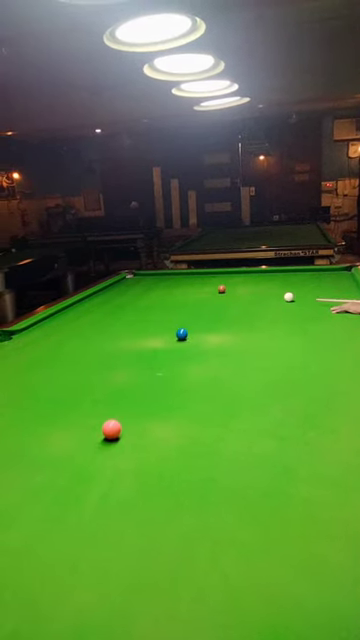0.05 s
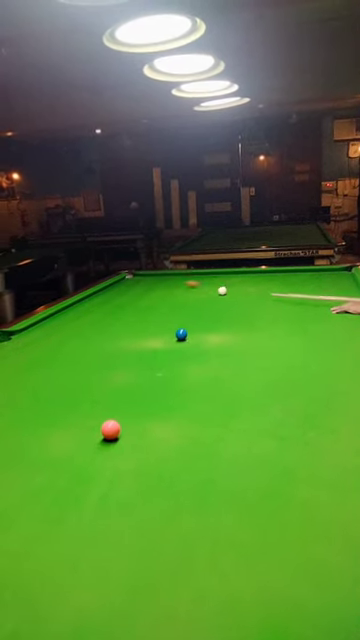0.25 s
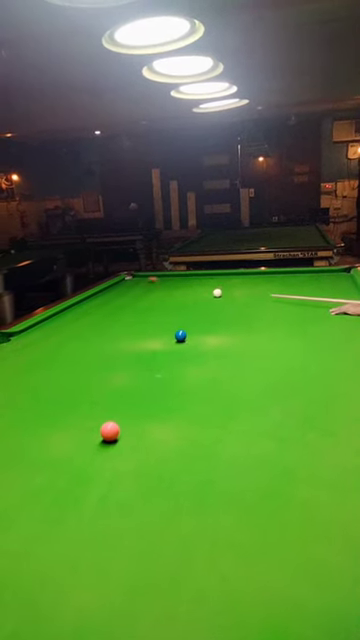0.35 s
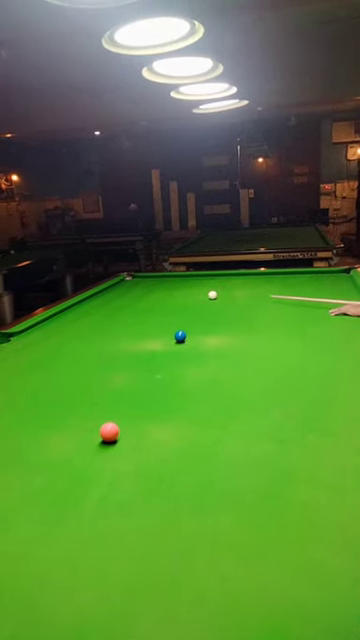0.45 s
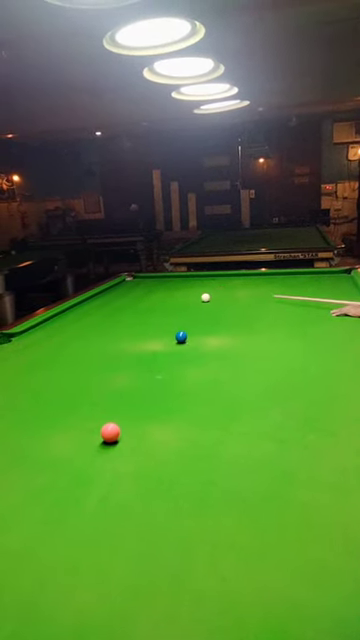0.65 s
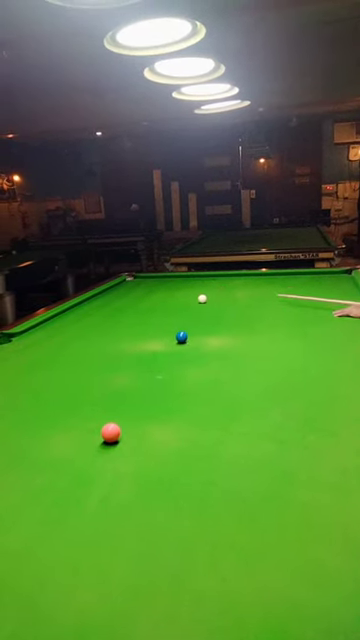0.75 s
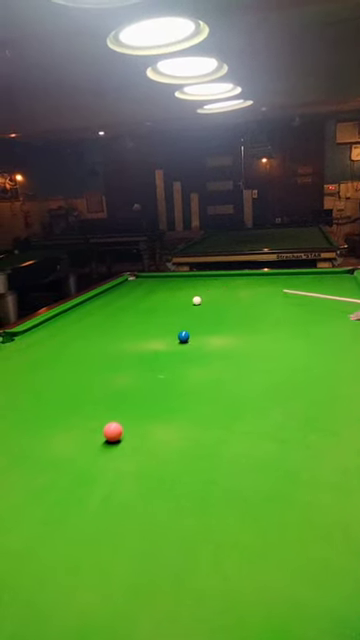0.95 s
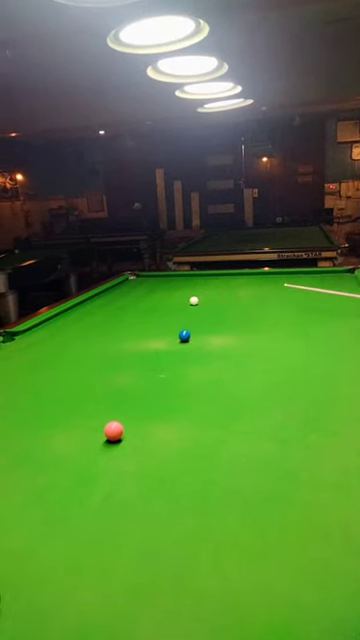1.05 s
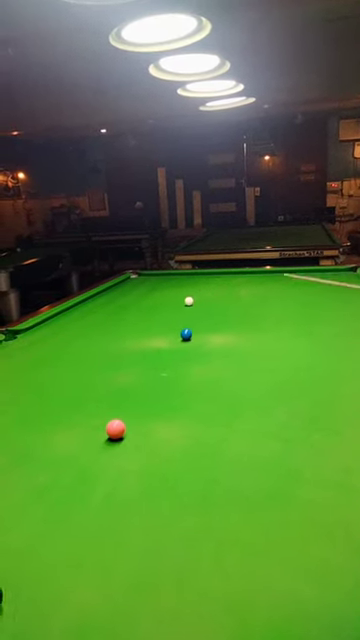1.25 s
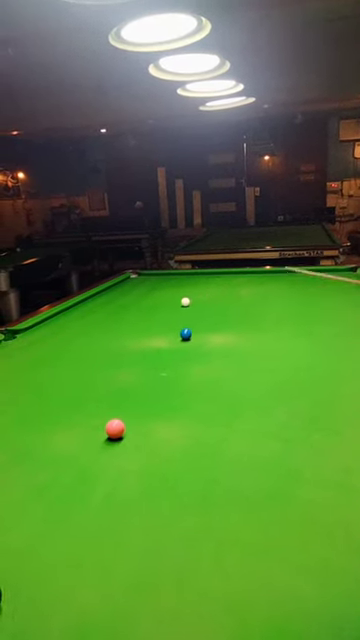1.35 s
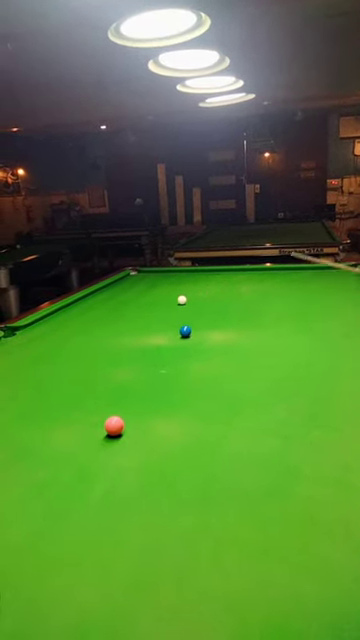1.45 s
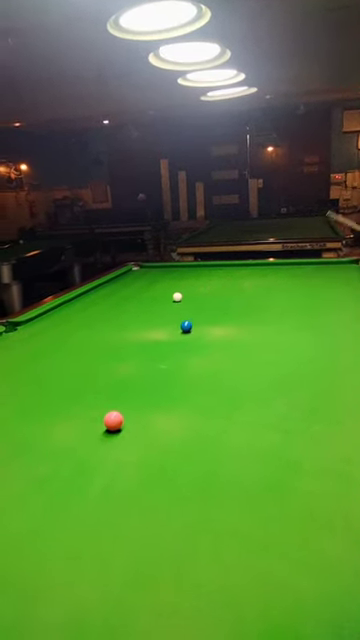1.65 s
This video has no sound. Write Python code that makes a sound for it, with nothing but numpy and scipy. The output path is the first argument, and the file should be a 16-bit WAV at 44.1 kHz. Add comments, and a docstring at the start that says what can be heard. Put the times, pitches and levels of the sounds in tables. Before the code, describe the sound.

One snooker ball clacks against another, which thuds into a pocket in a quiet hall.

```python
"""A faint, low rumble fills a large, quiet hall, with a thin whine and the tones of the lamps.
A snooker cue taps the white ball and its shaft rings briefly. The white clacks against a red,
echoed by table and ceiling. The red thuds into a far pocket, the table's frame rings and the hall
rings on. Soft rustles follow, a low hum grows, and at the end balls click on a far table."""
import sys
import numpy as np
from scipy import signal
from scipy.fft import rfft, irfft, next_fast_len
from scipy.io import wavfile

SR = 44100
rng = np.random.default_rng(int(sys.argv[2]) if len(sys.argv) > 2 else 0)


def to_wav(sig):
    """Store sig (one row per channel, or 1-D mono) as 16-bit WAV at the path in sys.argv[1].

    Samples outside -1..1 are clipped; the rate is SR.
    """
    pcm = np.clip(np.atleast_2d(sig), -1, 1) * 32767
    pcm = np.round(pcm).astype(np.int16)
    wavfile.write(sys.argv[1], SR, pcm.T)  # frames by channels


N = 74970

# tone colour of the hall's rumble, airy noise and high hiss (frequency [Hz], relative level [dB])
RUMBLE_COLOUR = [(15, -13), (28, 5), (45, 0), (65, 0), (85, -10.5), (130, -3), (200, -8.5), (300, -32.5),
                 (500, -28), (1000, -92)]
AIR_COLOUR = [(100, -9.5), (250, 1.5), (400, -8), (1000, -11), (2000, -18.5), (4000, -25.5), (8000, -33.5),
              (16000, -40)]
HISS_COLOUR = [(2000, -20), (5000, -14), (8200, 3.5), (10000, -8.5), (14000, -3), (15000, 2.5),
               (16000, -17.5)]
# how loud those three and the hum are as time passes (time [s], level [dB])
RUMBLE_LEVEL = [(0, -64), (.45, -61.5), (.95, -59), (1.08, -58), (1.7, -57.5)]
AIR_LEVEL = [(0, -76), (.6, -83), (1.6, -69.5)]
HISS_LEVEL = [(0, -88), (.45, -83), (1.1, -73.5), (1.35, -81), (1.65, -74)]
HUM_LEVEL = [(0, -88), (1.25, -78), (1.45, -66), (1.7, -60)]
# the lamps' steady tones (frequency [Hz], level [dB])
LAMP_TONES = [(2745, -94), (3074, -89)]

# the cue's tip touching the white (time [s], thud level [dB], tick level [dB])
CUE_HITS = [(0.1414, -20.5, -27), (.1475, -19.5, -18.5)]
# tone colour of that thud and tick (frequency [Hz], relative level [dB])
CUE_THUD = [(80, -20.5), (220, -3), (750, 0.5), (1300, -0.5), (2000, -20.5), (4000, -13), (16000, -85)]
CUE_TICK = [(300, -78), (1500, 1.5), (3000, 4), (6000, -6), (8000, -1.5), (10000, -15.5), (14500, -16),
            (16000, -41)]
# A fade time, or t60, is how long a sound takes to drop by 60 dB.
# the notes of the cue's shaft (frequency [Hz], level [dB], fade time [s])
SHAFT_NOTES = [(234, -56.5, 1), (790, -50, .15), (1560, -44.5, 0.59), (2130, -57.5, .4), (2865, -46, 0.18),
               (3560, -53, 0.12), (3944, -56, 0.26), (5150, -55.5, 0.27), (5669, -61, 0.65)]
# how long the hall rings (frequency [Hz], fade time [s])
HALL_FADE = [(100, 2), (250, 1.63), (400, 1.554), (1000, 1.454), (2000, 1.29), (4000, 1.177), (8000, 1),
             (12000, 0.75), (16000, 0.41)]

# ball on ball: the white on the red, then a far table (time [s], level [dB])
CLACKS = [(0.2301, -9.5), (1.6906, -39)]
# tone colour of a clack, its ring in the hall and its sizzle (frequency [Hz], relative level [dB])
CLACK_COLOUR = [(100, -42), (500, -27), (1200, -11), (2000, -3.5), (2700, -1), (3500, -7.5), (4400, -20),
                (6000, -31), (8400, -34), (10000, -43), (16000, -33)]
CLACK_IN_HALL = [(60, -70), (140, -28), (300, -17.5), (700, -22), (1300, -7), (2000, -1), (2600, 0),
                 (3500, -7.5), (4400, -16), (6000, -29.5), (8400, -32), (10000, -41), (16000, -41)]
SIZZLE_COLOUR = [(4000, -34), (7000, -57), (8400, -7), (9700, -28), (12000, -15), (13300, -32), (14900, -5),
                 (16000, -14.5)]
# early echoes off table, lamps and ceiling (delay [s], level against the direct click [dB])
ECHOES = [(.0015, 1.5), (.0060, -6), (.0070, -1.5), (.0108, -3), (.0116, -5), (.0126, -3.5), (.0325, -12),
          (0.0433, -8), (.0458, -6), (0.0542, -12)]

# the red bumping around the pocket (time [s], thud level [dB], knock level [dB])
POCKET_HITS = [(0.4918, -16, -23), (0.4969, -5, -15), (.5040, -3.5, -6.5), (0.5131, -15, -5.5),
               (0.5251, -19, -11.5), (0.5411, -17.5, -13.5)]
# tone colour of that thud and knock (frequency [Hz], relative level [dB])
POCKET_THUD = [(60, -58.5), (140, -25), (200, -9), (260, -5.5), (350, 0.5), (540, -2), (800, -8.5),
               (1500, -18), (4000, -48), (16000, -51)]
POCKET_KNOCK = [(150, -15.5), (500, -7.5), (1050, 1), (1550, 0), (2000, -5), (2700, -8), (3800, -13.5),
                (4500, -26), (6500, -26.5), (8300, -21), (10500, -37), (16000, -55)]
# the notes of the table's frame (frequency [Hz], level [dB], fade time [s])
FRAME_NOTES = [(336, -23, .11), (392.7, -37.5, 1.23), (502, -21, 0.027), (594, -43.5, 0.65),
               (660.6, -45, 0.36), (1048, -29, 0.17), (1308, -46, 1.3), (1472, -43.5, 0.79),
               (1589, -46.5, .7)]

# soft rustles (time [s], level [dB], rise time [s], fade time [s], treble tilt [dB per octave])
RUSTLES = [(0.496, -64, 0.0036, .25, 2), (.612, -56.5, .002, 0.96, 4), (0.772, -62, .002, 0.76, 1),
           (.861, -57.5, 0.0012, 0.7, 1), (.885, -60, 0.016, 0.99, -8.5), (1.416, -73.5, 0.0039, .95, 11),
           (1.543, -58.5, 0.032, 0.26, -4), (1.694, -58.5, 0.003, .4, -3)]
# their tone colour before the tilt (frequency [Hz], relative level [dB])
RUSTLE_COLOUR = [(1000, -45), (4500, -12), (6800, -5), (8200, 4), (10000, -6.5), (13000, -9.5),
                 (15000, -11), (16000, -24.5)]


def amp(db):
    """Turn decibels into a number to multiply a sound by."""
    return 10 ** (np.asarray(db) / 20)


def unit(x):
    """Scale x to an average strength (rms) of 1."""
    return x / np.sqrt(np.mean(x ** 2) + 1e-20)


def clock():
    """The time of each sample, in seconds."""
    return np.arange(N) / SR


def along(points, hz):
    """Read between (frequency, value) points, spacing octaves evenly."""
    freqs, values = np.transpose(points)
    return np.interp(np.log(hz + 1), np.log(freqs + 1), values)


def level(points):
    """A volume curve through (time [s], level [dB]) points."""
    return amp(np.interp(clock(), *np.transpose(points)))


def at(s, x):
    """Start x after s seconds."""
    return np.pad(x, (max(0, int(round(s * SR))), 0))[:N]


def through(x, response):
    """Let every sample of x set off a copy of the response (convolution)."""
    return signal.fftconvolve(x, response)[:N]


def filtered(x, gain_at):
    """Turn each frequency in x up or down by gain_at(hz)."""
    size = next_fast_len(N + SR // 2)
    hz = np.fft.rfftfreq(size, 1 / SR)
    return irfft(rfft(x, size) * gain_at(hz), size)[:N]


def noise(colour):
    """Noise of strength 1 with this tone colour."""
    return unit(filtered(rng.standard_normal(N), lambda hz: amp(along(colour, hz))))


def narrow_noise(centre_hz, width_hz):
    """Noise of strength 1 near one frequency; near 0 Hz it is a random wobble."""
    return unit(filtered(rng.standard_normal(N), lambda hz: 1 / (1 + ((hz - centre_hz) / width_hz) ** 2)))


def tone(hz):
    """A steady tone of strength 1."""
    return unit(np.sin(2 * np.pi * hz * clock()))


def fade(t, t60):
    """A curve that drops by 60 dB every t60 seconds."""
    return np.exp(-np.log(1000) * t / t60)


def swell(rise_s, t60):
    """A volume curve that rises, then dies away."""
    return (1 - np.exp(-clock() / rise_s)) * fade(clock(), t60)


def room_noise():
    """The hall's rumble, airy noise and hiss, each drifting slowly in level."""
    rumble = level(RUMBLE_LEVEL) * noise(RUMBLE_COLOUR)
    air = level(AIR_LEVEL) * noise(AIR_COLOUR)
    hiss = level(HISS_LEVEL) * noise(HISS_COLOUR)
    return rumble + air + hiss


def whine(hz=3060):
    """A faint, high tone wrapped in hiss; both fade together."""
    hiss = amp(-3) * narrow_noise(hz, width_hz=200)
    return amp(-78) * fade(clock(), t60=2.7) * (tone(hz) + hiss)


def lamps():
    """The lamps give off thin, steady tones."""
    return sum(amp(db) * tone(hz) for hz, db in LAMP_TONES)


def hum(hz=170.3, waver_db=-0.5):
    """A low hum that trembles slightly and grows toward the end."""
    return level(HUM_LEVEL) * tone(hz) * amp(waver_db * narrow_noise(0, width_hz=12))


def pulse(colour, size=4096):
    """The shortest pulse with this tone colour and nothing before its start, energy 1."""
    gains = amp(along(colour, np.fft.rfftfreq(size, 1 / SR)))
    cepstrum = irfft(np.log(gains))
    # folding the second half onto the first packs the energy at the start
    cepstrum[1:size // 2] *= 2
    cepstrum[size // 2 + 1:] = 0
    wave = irfft(np.exp(rfft(cepstrum)))
    return np.pad(wave / np.linalg.norm(wave), (0, N - size))


def bump(colour, t60, hall_db):
    """A hit on something that barely rings: a short burst of noise and the hall's answer."""
    burst = rng.standard_normal(N) * fade(clock(), t60)
    return through(burst / np.linalg.norm(burst) + amp(hall_db) * hall(), pulse(colour))


def ring(notes, rise_s, waver_hz):
    """A struck object's fading notes; each wavers in pitch as it mixes with its echoes."""
    sound = np.zeros(N)
    for hz, db, t60 in notes:
        start_phase = rng.random()
        pitch = hz + waver_hz * narrow_noise(0, width_hz=24.6)
        cycles = start_phase + np.cumsum(pitch) / SR
        sound += amp(db) * swell(rise_s, t60) * np.sin(2 * np.pi * cycles)
    return sound


def cue():
    """The cue's tip thuds and ticks on the white ball, and the shaft rings."""
    hits = np.zeros(N)
    for s, thud_db, tick_db in CUE_HITS:
        thud = amp(thud_db) * bump(CUE_THUD, t60=0.016, hall_db=0)
        tick = amp(tick_db) * bump(CUE_TICK, t60=0.13, hall_db=0)
        hits += at(s, thud + tick)
    shaft = ring(SHAFT_NOTES, rise_s=0.004, waver_hz=4.6)
    return hits + at(CUE_HITS[0][0], shaft)


def hall(delay_s=0.003, build_s=0.02):
    """The hall's wash of echoes, energy 1: it builds up, and the treble dies first."""
    hz, t, bands = signal.stft(rng.standard_normal(N), SR, nperseg=256)
    bands = bands * fade(t, along(HALL_FADE, hz)[:, None])
    tail = signal.istft(bands, SR, nperseg=256)[1][:N]
    tail = at(delay_s, tail * (1 - np.exp(-clock() / build_s)))
    return tail / np.linalg.norm(tail)


def snap(colour, s):
    """A symmetric pulse with this tone colour, centred at s seconds, energy 1."""
    wave = filtered(at(s, signal.unit_impulse(N)), lambda hz: amp(along(colour, hz)))
    return wave / np.linalg.norm(wave)


def clack(s, db):
    """Two hard balls meet: one sharp click, its early echoes, the hall and a fine sizzle."""
    click = snap(CLACK_COLOUR, s)
    echoes = sum(amp(echo_db) * at(delay, click) for delay, echo_db in ECHOES)
    tail = amp(6) * through(snap(CLACK_IN_HALL, s), hall())
    sizzle = amp(-39.5) * noise(SIZZLE_COLOUR) * swell(rise_s=0.0034, t60=0.36)
    return amp(db) * (click + echoes + tail + at(s, sizzle))


def pocket():
    """The red bumps the pocket's padded edge and back, making the table's frame ring."""
    hits = np.zeros(N)
    for s, thud_db, knock_db in POCKET_HITS:
        thud = amp(thud_db) * bump(POCKET_THUD, t60=0.035, hall_db=-2.5)
        knock = amp(knock_db) * bump(POCKET_KNOCK, t60=0.074, hall_db=1.5)
        hits += at(s, thud + knock)
    frame = ring(FRAME_NOTES, rise_s=0.005, waver_hz=9.4)
    return hits + at(POCKET_HITS[0][0], frame)


def rustles():
    """Faint puffs of hiss that start quickly and fade, each with its own brightness."""
    sound = np.zeros(N)
    lowest_hz = RUSTLE_COLOUR[0][0]
    for s, db, rise_s, t60, tilt in RUSTLES:
        colour = [(hz, band_db + tilt * np.log2(hz / lowest_hz)) for hz, band_db in RUSTLE_COLOUR]
        sound += at(s, amp(db) * swell(rise_s, t60) * noise(colour))
    return sound


def scene():
    """Everything reaches one microphone at the table's end."""
    play = cue() + sum(clack(s, db) for s, db in CLACKS) + pocket()
    return (play + rustles() + room_noise() + hum() + whine() + lamps())[None]


def record(dry):
    """Cut away the very highest treble."""
    top_hz = 15850
    return np.array([filtered(x, lambda hz: hz < top_hz) for x in dry])


dry = scene()
out = record(dry)
to_wav(out)
```